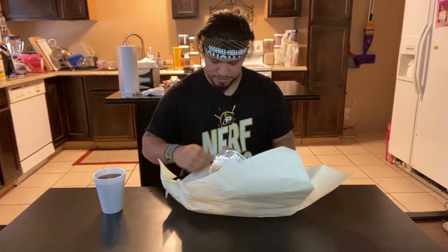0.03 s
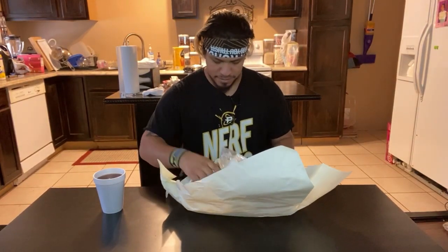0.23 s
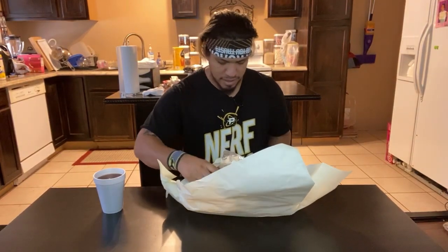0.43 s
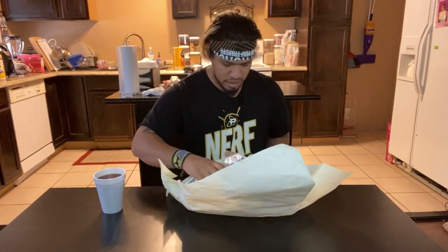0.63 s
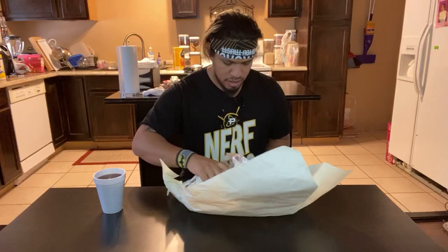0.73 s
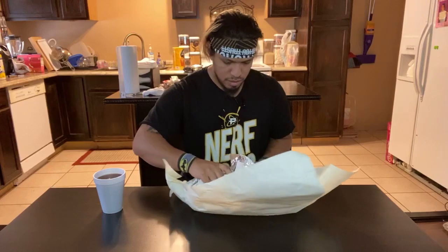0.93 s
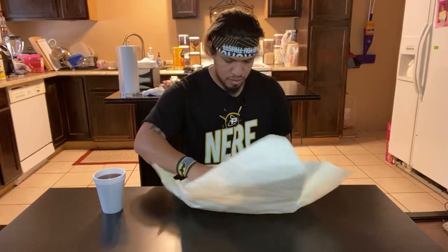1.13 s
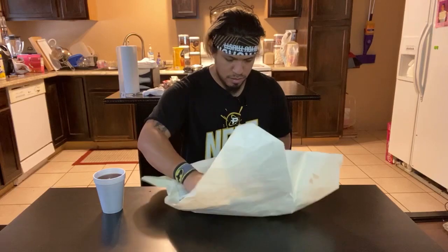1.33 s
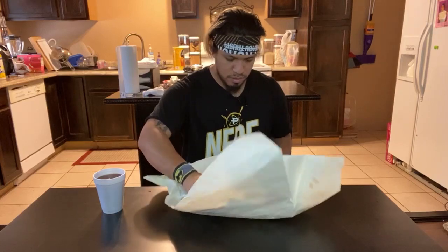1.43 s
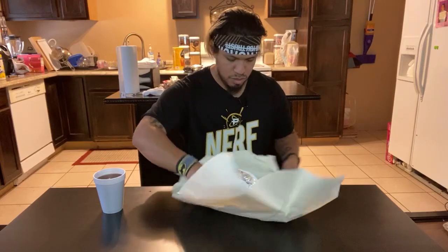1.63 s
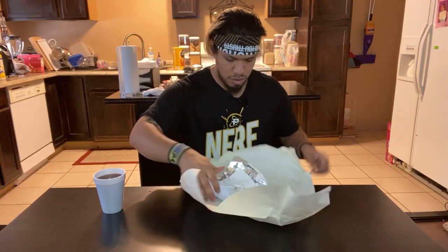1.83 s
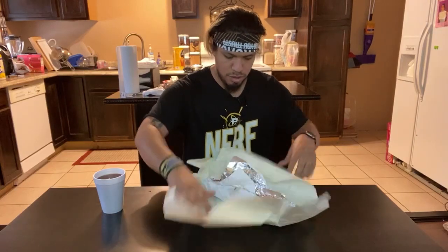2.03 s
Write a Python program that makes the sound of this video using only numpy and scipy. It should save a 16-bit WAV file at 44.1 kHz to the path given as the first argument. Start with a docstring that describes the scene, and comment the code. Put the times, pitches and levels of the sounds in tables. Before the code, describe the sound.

Paper and foil food wrapping is opened by hand. Small ticks come first, then faint finger rubbing from 0.3 to 0.7 seconds with soft bumps. Snaps gather and from 0.8 to 1.4 dense bright crinkling and sliding hiss dominate, with low paper flaps. It eases, bursts sharply near 1.65, and crackles again from 1.9. Small kitchen, faint echo, intermittent low rumble, quiet room noise.

```python
"""At a kitchen table, hands pull open paper and foil food wrapping.
Early on, fingers rub along the parcel: fine slips ring a fold. Creases snap: pulses ring small facets and pop panels.
Swarms of clicks make the crinkles, and filtered noise makes the hiss of sliding sheets. The big paper sheet
flexes in longer, duller grains and flaps with low knocks; hands and parcel bump softly.
A small kitchen rings faintly, over a deep rumble that comes and goes and steady room noise."""
import sys
import numpy as np
from scipy import signal
from scipy.fft import rfft, irfft, next_fast_len
from scipy.io import wavfile
from scipy.ndimage import map_coordinates

SR = 44100
rng = np.random.default_rng(int(sys.argv[2]) if len(sys.argv) > 2 else 0)


def output_pcm(signal):
    """Save a mono or channel-first signal as 16-bit PCM at the path in sys.argv[1].

    Samples are clipped to [-1, 1] before scaling.
    """
    pcm = np.clip(np.atleast_2d(signal).T, -1, 1) * 32767
    wavfile.write(sys.argv[1], SR, np.round(pcm).astype(np.int16))


N = 91683  # length in samples


def from_db(db):
    """Turn decibels into gain."""
    return 10 ** (np.asarray(db) / 20)


def rms_one(x):
    """Scale to an average (rms) level of 1."""
    return x / np.sqrt(np.mean(x ** 2) + 1e-20)


def energy_one(x):
    """Scale to a total energy of 1."""
    return x / np.sqrt(np.sum(x ** 2) + 1e-20)


def noise(count=N):
    """White noise."""
    return rng.standard_normal(count)


def in_time(rows):
    """Draw straight lines between table rows, giving a value at every sample."""
    return np.interp(np.arange(N) / SR, *np.transpose(rows))


def band(x, hz, kind):
    """Keep part of the pitch range with a Butterworth filter."""
    return signal.sosfilt(signal.butter(2, hz, kind, fs=SR, output="sos"), x)


def colour(x, spectrum):
    """Give a sound the listed tone, with a filter that never acts ahead of time (minimum phase)."""
    size = 2 * next_fast_len(len(x))
    hz, db = np.transpose(spectrum)
    grid_hz = np.maximum(np.arange(size // 2 + 1) * SR / size, 1)
    gain = from_db(np.interp(np.log(grid_hz), np.log(hz), db))
    # folding the cepstrum onto its first half makes the filter minimum phase
    cepstrum = irfft(np.log(gain))
    cepstrum[1:size // 2] *= 2
    cepstrum[size // 2 + 1:] = 0
    response = np.exp(rfft(cepstrum))
    return irfft(rfft(x, size) * response)[:len(x)]


def dying(t, t60):
    """Fade exponentially, by 60 dB in t60 seconds."""
    return from_db(-60 * t / t60)


def add(out, s, sound):
    """Mix a sound in at time s."""
    i = max(int(s * SR), 0)
    out[i:i + len(sound)] += sound[:max(N - i, 0)]


def resonance(x, hz, width_hz):
    """Let one resonance ring, with gain 1 at its peak."""
    return signal.lfilter(*signal.iirpeak(hz, hz / width_hz, fs=SR), x)


def slips(per_s, spread_db):
    """Random clicks of uneven size and either sign, each smaller where they come denser."""
    size_db = spread_db * np.minimum(rng.exponential(1, N), 4)
    clicks = from_db(size_db) * rng.choice([-1, 1], N)
    return clicks * (rng.random(N) < per_s / SR) / np.sqrt(per_s)


FACET_RANGE_HZ, FACET_WIDTH_HZ, FACET_DB = (1190, 9150), 440, 7


def grains(per_s, spread_db, t60, spectrum, count=24):
    """Clicks dealt to small facets of the sheet, each ringing briefly at its own pitch; rms 1."""
    t = np.arange(SR // 25) / SR
    clicks = slips(per_s, spread_db)
    dealt = rng.integers(0, count, N)
    out = 0
    for k, hz in enumerate(np.linspace(*FACET_RANGE_HZ, count)):
        shiver = noise(len(t)) * dying(t, t60)
        ring = resonance(shiver, hz, FACET_WIDTH_HZ)
        facet = energy_one(shiver + from_db(FACET_DB) * ring)
        out = out + signal.fftconvolve(clicks * (dealt == k), facet)[:N]
    return rms_one(colour(out, spectrum))


# level of the deep rumble: start_s, level_db
RUMBLE_LEVEL = [(0, -57.5), (.2, -54.5), (.42, -48), (.6, -53), (.9, -56.5), (1.2, -54.5), (1.45, -63.5),
                (1.8, -62.5), (1.95, -55.5), (2.08, -47.5)]
# relative tone of the rumble: pitch_hz, level_db
RUMBLE_TONE = [(12, -0.5), (28, 2.5), (50, -11), (100, -22), (250, -21), (1000, -72)]
# relative tone of the still room: pitch_hz, level_db
ROOM_TONE = [(30, -8.5), (100, -21), (250, -25.5), (600, -27), (1500, -53), (3000, -46), (4500, -36),
             (6500, -44), (10000, -48), (16000, -47)]
ROOM_DB = -61.5


def background():
    """Noise filtered into a deep rumble that comes and goes, and the steady noise of the room."""
    rumble = from_db(in_time(RUMBLE_LEVEL)) * rms_one(colour(noise(), RUMBLE_TONE))
    room = from_db(ROOM_DB) * rms_one(colour(noise(), ROOM_TONE))
    return rumble + room


# how loudly the big sheet rustles as it bends, before FLEX_DB: start_s, level_db
FLEXING = [(0, -63), (0.12, -76), (0.16, -58.5), (0.24, -67), (0.29, -60.5), (0.55, -59.5), (0.69, -46.5),
           (0.82, -51), (0.87, -49.5), (0.94, -47), (1.0, -44.5), (1.1, -45.5), (1.25, -41), (1.35, -43.5),
           (1.44, -54.5), (1.62, -51), (1.68, -40), (1.73, -49), (1.8, -51.5), (1.87, -48), (1.95, -41.5),
           (2.0, -45.5), (2.08, -46)]
# relative tone of its hollow rustle: pitch_hz, level_db
SHEET_TONE = [(60, -3), (130, -2), (280, -1.5), (450, -2.5), (800, -0.5), (1150, -0.5), (1600, -2.5),
              (2400, -5), (4000, -9), (12000, -46)]
FLEXES_PER_S, FLEX_SPREAD_DB, FLEX_T60_S, FLEX_DB = 800, 2.5, 0.028, -4


def big_sheet():
    """Broad panels of paper flex with duller, longer grains than the crinkles."""
    flexes = grains(FLEXES_PER_S, FLEX_SPREAD_DB, FLEX_T60_S, SHEET_TONE)
    return from_db(in_time(FLEXING) + FLEX_DB) * flexes


# how hard the wrapping is crumpled, as crinkle level before CRINKLE_DB: start_s, level_db
HANDLING = [(0, -77), (.09, -69), (.165, -52.5), (.25, -62.5), (.45, -62), (.6, -56), (.68, -60),
            (.72, -65), (.77, -69), (.835, -45), (.88, -40), (.94, -41), (1.05, -39.5), (1.1, -42.5),
            (1.19, -37.5), (1.28, -39), (1.36, -40), (1.42, -50), (1.5, -48), (1.62, -43), (1.68, -35.5),
            (1.73, -43.5), (1.8, -46.5), (1.87, -44.5), (1.92, -39), (1.965, -40), (2.0, -48.5),
            (2.08, -40)]
# relative tone of a buckling crease, for crinkles and snaps: pitch_hz, level_db
CREASE_TONE = [(150, -14.5), (500, -14.5), (1100, -15.5), (1600, -17.5), (2500, -2.5), (3500, -2),
               (4600, 2), (5900, -4.5), (7000, -6), (8000, -10.5), (10000, -22.5), (12000, -27),
               (16000, -40)]
# hiss of sheet sliding on sheet, before SLIDE_DB: start_s, level_db
SLIDING = [(0, -85.5), (0.17, -66.5), (0.4, -81), (0.6, -72), (0.68, -62.5), (0.83, -60), (0.88, -51.5),
           (1.02, -47.5), (1.17, -48), (1.28, -53), (1.36, -56.5), (1.42, -67.5), (1.52, -57), (1.67, -56),
           (1.79, -63.5), (1.89, -85), (1.95, -68), (2.0, -69), (2.08, -76.5)]
# relative tone of that hiss: pitch_hz, level_db
SLIDE_TONE = [(200, -14), (1000, -8), (2000, -8), (3700, -4), (4600, 3.5), (5900, -3.5), (7500, -4.5),
              (9500, -11), (12000, -18.5), (16000, -26)]
MOST_CRINKLES_PER_S, CRINKLE_RATE_FOLLOWS = 1800, .6  # the share of the dB level the rate follows
CRINKLE_SPREAD_DB, CRINKLE_T60_S = 1.5, 0.0071
CRINKLE_DB, SLIDE_DB = -4.5, 8.5
RUNS_CUTOFF_HZ, RUNS_DB = 85, 2  # crinkles come in quick runs


def rustle():
    """Harder crumpling brings more and louder crinkles; sliding sheets add a bright hiss."""
    db = in_time(HANDLING)
    per_s = MOST_CRINKLES_PER_S * from_db(CRINKLE_RATE_FOLLOWS * (db - db.max()))
    swings = rms_one(band(noise(), RUNS_CUTOFF_HZ, "low"))
    runs = rms_one(from_db(RUNS_DB * swings))
    crinkles = runs * grains(per_s, CRINKLE_SPREAD_DB, CRINKLE_T60_S, CREASE_TONE)
    slide = rms_one(colour(noise(), SLIDE_TONE))
    return from_db(db + CRINKLE_DB) * crinkles + from_db(in_time(SLIDING) + SLIDE_DB) * slide


# creases that buckle; levels are before the SNAP settings, pop and treble are relative to the ring:
# peak_s, level_db, ring_hz, pop_db, pop_hz, treble_db
SNAPS = [(0.0305, -51, 4800, -8, 1550, -5), (0.1494, -47, 4930, -1, 1380, -12),
         (0.1545, -48, 4650, 2, 1120, -10), (0.1616, -45, 2890, -4, 1070, -15),
         (0.1665, -46, 4710, -5, 970, -9), (0.171, -47, 3060, -10, 1090, -8),
         (0.2037, -38, 5100, -19, 750, -9), (0.2193, -48, 4170, -7, 810, -7),
         (0.2765, -55, 4400, 2, 1000, -10), (0.315, -56, 7000, -10, 1200, 1),
         (0.43, -56, 4500, -14, 1200, 0), (0.462, -53, 4500, -14, 1200, 0),
         (0.5749, -43, 4600, -16, 1180, -15), (0.5938, -45, 2650, 0, 1600, -6),
         (0.6125, -44, 3330, 3, 1200, -11), (0.6548, -48, 4780, 5, 1150, -9),
         (0.6605, -33.5, 4410, -9, 1500, -22), (0.6647, -39, 4400, 1, 1350, -9),
         (0.6878, -39.5, 4290, 4, 1400, -9), (0.6919, -35, 4430, -7, 1200, -11),
         (0.7361, -35, 4310, 1, 1180, -3), (0.7424, -37, 4860, -6, 1280, -7),
         (0.7604, -36, 4510, -2, 1450, -8), (0.7698, -36, 4410, -7, 1110, -11),
         (0.8017, -26, 2500, -7, 1350, -4), (0.8152, -33, 4540, -11, 1830, -10),
         (0.8199, -34, 6400, -9, 1010, -4), (0.8498, -22, 3300, -6, 1120, -4),
         (0.8504, -20, 4700, -14, 1380, -5), (0.8565, -28, 4690, -8, 1380, -6),
         (0.8593, -26.5, 4730, -11, 1090, -4.5), (0.8623, -26, 4620, -9, 1220, -9),
         (0.9231, -32, 4210, -9, 750, -9), (0.985, -40, 4500, 3, 1050, -8),
         (1.0055, -34, 4500, -9, 1200, -7), (1.0452, -30, 4640, -11, 1170, -9),
         (1.0481, -30, 4540, -10, 1580, -8), (1.1278, -26.5, 5010, -14, 1770, -11),
         (1.1474, -31, 4660, -15, 1730, -4), (1.1979, -24, 4900, -16, 820, -10),
         (1.2038, -27, 3500, -7, 2050, -9), (1.2133, -26, 4270, -13, 1080, -11),
         (1.2319, -31, 2800, -6, 1200, -3), (1.2603, -33, 2730, -4, 960, -15),
         (1.3916, -31, 5060, -7, 1900, -8), (1.4396, -39, 4350, -6, 1710, -13),
         (1.4865, -42, 2850, -4, 1500, -11), (1.5207, -37, 4630, -7, 2050, -7),
         (1.5386, -36, 4610, -9, 1610, -12), (1.5746, -30, 3500, -7, 1900, -14),
         (1.6125, -34, 4400, -12, 1410, -15), (1.6455, -20, 4380, -17, 1920, -7),
         (1.6486, -27, 5030, -9, 900, -3), (1.6529, -24, 4170, -15, 880, -8),
         (1.6713, -28, 4210, -15, 2010, -11), (1.7202, -31.5, 4300, -16, 2050, -14),
         (1.762, -39, 4000, -4, 850, -11), (1.817, -36, 4960, -5, 1500, -13),
         (1.8421, -30, 4680, -16, 2050, -8), (1.9094, -31, 4360, -4, 1900, -17),
         (1.9584, -33.5, 6700, -6, 1820, -6), (2.0217, -23, 4400, -19, 1300, -7.5),
         (2.0344, -33, 4650, -9, 860, -6), (2.0666, -31, 3040, -10, 1830, -17),
         (2.0698, -35, 2550, -6, 1210, -18)]
SNAP_DB, SNAP_POP_DB, SNAP_TREBLE_DB = 18, 1.5, 1.5
BUCKLE_DB, SNAP_LEAD_S = 13, .00012  # the first sharp pulse, over the crack; it starts just ahead
CRACK_T60_S, FLUTTER_T60_S, FLUTTER_DB = 0.0012, 0.016, -0.5  # the crack, then the sheet shivers
BASS_EDGE_HZ, TREBLE_EDGE_HZ = 2080, 6900
RING_WIDTH_HZ, RING_DB = 430, 7  # the small facet at the crease
POP_WIDTH_HZ, POP_DB, POP_LOW_HZ = 310, 12, 585  # the wider panel that flips over
TREBLE_TOP_HZ, TOP_HZ_PER_DB, TYPICAL_SNAP_DB = 13700, 454, -30.5  # harder snaps reach higher
TOP_RANGE_HZ = (9500, 18000)
OPEN_S, OPEN_DULLS_HZ = 1.78, 3550  # once the sheet lies open, its snaps lose their top


def snaps():
    """A crease gives a sharp pulse, a crack and a shiver, which ring a facet and pop a panel."""
    out, t = np.zeros(N), np.arange(SR // 25) / SR
    envelope = dying(t, CRACK_T60_S) + from_db(FLUTTER_DB) * dying(t, FLUTTER_T60_S)
    for s, db, ring_hz, pop_db, pop_hz, treble_db in SNAPS:
        pulse = from_db(BUCKLE_DB) * (t == 0)
        shiver = rng.choice([-1, 1], len(t)) * envelope * (t > 0)
        crack = colour(pulse + shiver, CREASE_TONE)

        bass = band(band(crack, [POP_LOW_HZ, BASS_EDGE_HZ], "band"), BASS_EDGE_HZ, "low")
        pop = energy_one(bass + from_db(POP_DB) * resonance(bass, pop_hz, POP_WIDTH_HZ))

        middle = band(crack, [BASS_EDGE_HZ, TREBLE_EDGE_HZ], "band")
        ring = energy_one(middle + from_db(RING_DB) * resonance(middle, ring_hz, RING_WIDTH_HZ))

        top_hz = TREBLE_TOP_HZ + TOP_HZ_PER_DB * (db - TYPICAL_SNAP_DB)
        top_hz = np.clip(top_hz - OPEN_DULLS_HZ * (s > OPEN_S), *TOP_RANGE_HZ)
        treble = band(crack, [TREBLE_EDGE_HZ, top_hz], "band")
        treble = energy_one(band(treble, TREBLE_EDGE_HZ, "high"))

        snap = ring + from_db(pop_db + SNAP_POP_DB) * pop
        snap = snap + from_db(treble_db + SNAP_TREBLE_DB) * treble
        add(out, s - SNAP_LEAD_S, from_db(db + SNAP_DB) * snap)
    return out


# soft bumps of hands and parcel: start_s, level_db, pitch_hz
BUMPS = [(0.138, -58, 53), (0.273, -58, 69), (0.35, -57, 170), (0.385, -50.5, 85), (.385, -55, 287),
         (0.434, -61, 113), (0.639, -52.5, 65.5), (0.862, -49.5, 131), (0.909, -46, 76), (1.04, -47, 109),
         (1.12, -50.5, 90.5), (1.958, -53, 118)]
BUMP_RISE_S, BUMP_WIDTH = 0.0078, 1.52  # band edges lie this factor either side of the pitch


def bumps():
    """Soft low thuds of filtered noise that swell and fade."""
    out, age = np.zeros(N), np.arange(SR // 6) / SR / BUMP_RISE_S
    envelope = age * np.exp(1 - age)
    for s, db, hz in BUMPS:
        thud = band(noise(len(age)) * envelope, [hz / BUMP_WIDTH, hz * BUMP_WIDTH], "band")
        add(out, s, from_db(db) * energy_one(thud) * np.linalg.norm(envelope))
    return out


# panels of the big sheet that flap over with a low knock: start_s, ring level_db, pitch_hz
FLAPS = [(.156, -54.5, 410), (.276, -56, 435), (0.611, -53, 179), (0.697, -44, 208), (0.8499, -42, 271),
         (0.8492, -43, 487), (1.235, -46, 325), (1.257, -41, 309.5), (1.816, -48, 533)]
FLAP_T60_S, FLAP_SLAP_DB, FLAP_SLAP_T60_S = 0.083, 4, 0.028  # the slap level is over the ring


def flaps():
    """A panel flips over: a dull slap of noise and a short low ring."""
    out, t = np.zeros(N), np.arange(SR // 8) / SR
    for s, db, hz in FLAPS:
        slap = rms_one(band(noise(len(t)), [hz / 2, hz * 2], "band")) * dying(t, FLAP_SLAP_T60_S)
        ring = np.sin(2 * np.pi * hz * t) * dying(t, FLAP_T60_S)
        add(out, s, from_db(db) * (ring + from_db(FLAP_SLAP_DB) * slap))
    return out


# fingers rub along the parcel: start_s, level_db
RUBBING = [(.24, -94), (.28, -57.5), (.41, -61), (.5, -54), (.57, -54), (.66, -55.5), (.72, -68)]
# resonances of the rubbed fold at pitch ratio 1, relative levels: pitch_hz, width_hz, level_db
FOLD = [(1430, 120, -5), (3430, 400, -5.5), (4280, 110, 5.5), (5000, 250, 1), (6920, 910, -5)]
# the fold tightens under the fingers and its resonances rise: start_s, pitch_ratio
FOLD_PITCH = [(.28, 1), (.42, 1.015), (.53, 1.015), (.64, 1.02)]
RUB_SLIPS_PER_S, RUB_SPREAD_DB = 5000, 4.5


def fingers():
    """Fine slips ring in the resonances of a fold, whose pitch follows its tension."""
    friction = slips(RUB_SLIPS_PER_S, RUB_SPREAD_DB)
    rings = np.zeros(N)
    for k, (hz, width_hz, db) in enumerate(FOLD):
        sign = (-1) ** k  # neighbouring resonances get opposite signs
        rings += sign * from_db(db) * resonance(friction, hz, width_hz)
    # reading the sound faster raises its pitch
    read_at = np.cumsum(in_time(FOLD_PITCH))
    gliding = map_coordinates(rings, [read_at], mode="mirror")
    return from_db(in_time(RUBBING)) * rms_one(band(gliding, hz=8300, kind="low"))


KITCHEN_T60_S, KITCHEN_DB, FIRST_WALL_S = 0.24, -16.5, 0.0033


def kitchen(x):
    """A diffuse tail from walls and cupboards, made of fading noise dulled at the top."""
    t = np.arange(SR // 2) / SR
    echoes = noise(len(t)) * dying(t, KITCHEN_T60_S) * (t > FIRST_WALL_S)
    tail = energy_one(band(echoes, hz=9900, kind="low"))
    return from_db(KITCHEN_DB) * signal.fftconvolve(x, tail)[:N]


def scene():
    """The wrapping and its echo in the kitchen, over the background."""
    wrapping = snaps() + rustle() + fingers() + big_sheet() + bumps() + flaps()
    return (wrapping + kitchen(wrapping) + background())[None]


CUTOFF_HZ = 16000


def record(dry):
    """Cut the top steeply with an elliptic low-pass filter."""
    return signal.sosfilt(signal.ellip(10, .1, 70, CUTOFF_HZ, fs=SR, output="sos"), dry)


dry = scene()
out = record(dry)
output_pcm(out)
```